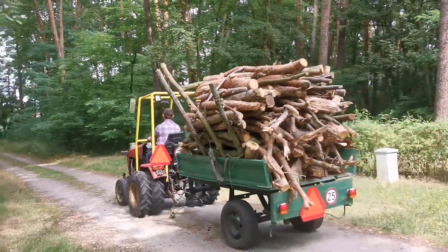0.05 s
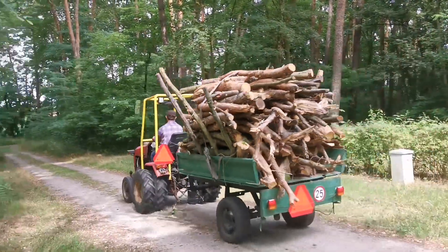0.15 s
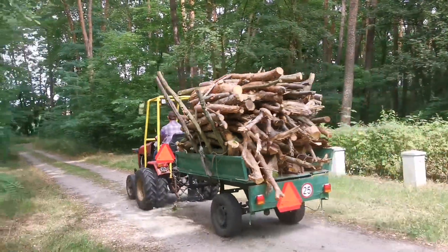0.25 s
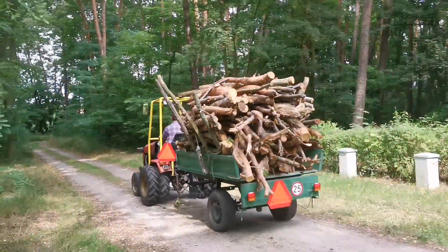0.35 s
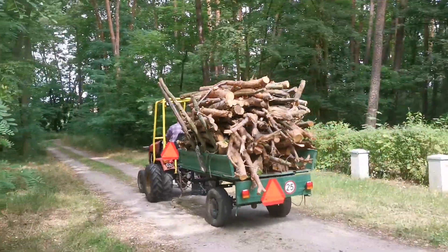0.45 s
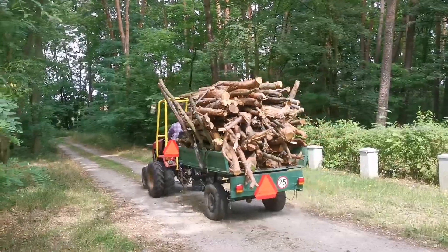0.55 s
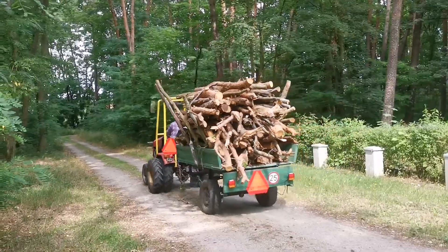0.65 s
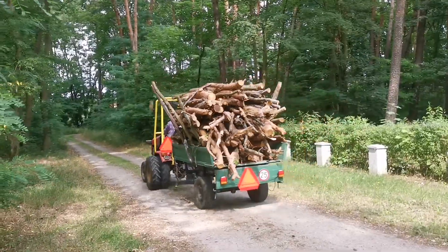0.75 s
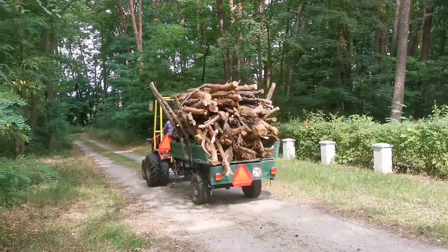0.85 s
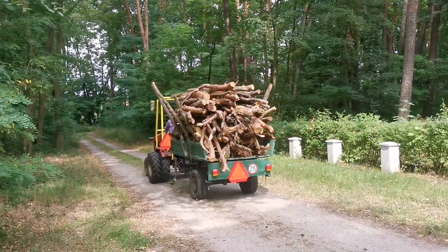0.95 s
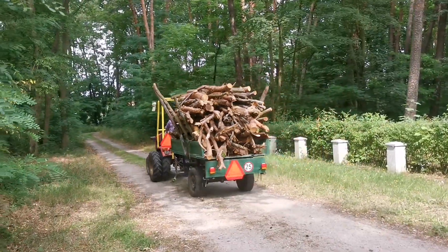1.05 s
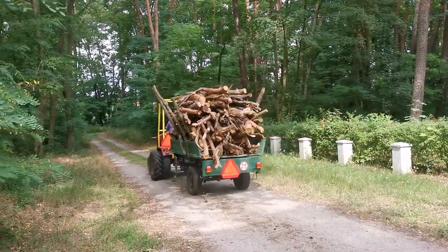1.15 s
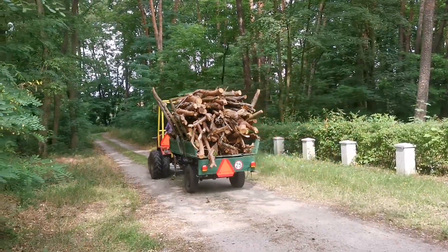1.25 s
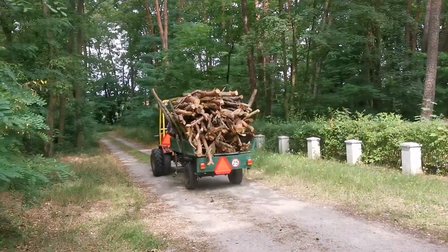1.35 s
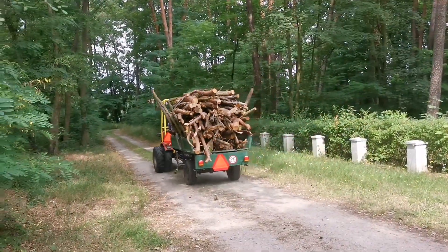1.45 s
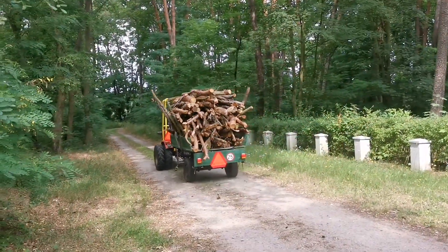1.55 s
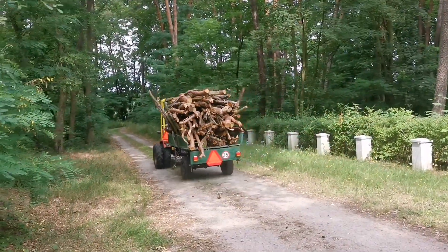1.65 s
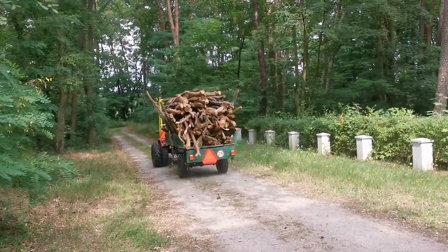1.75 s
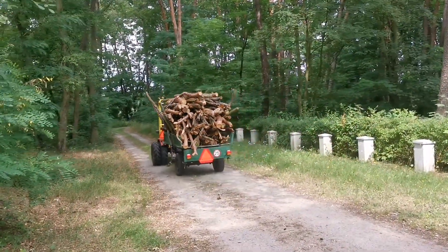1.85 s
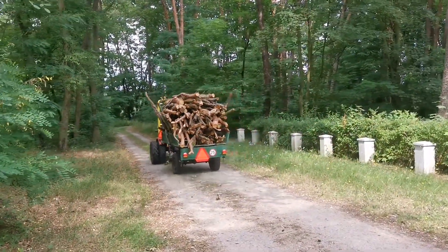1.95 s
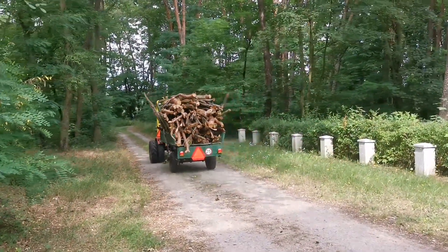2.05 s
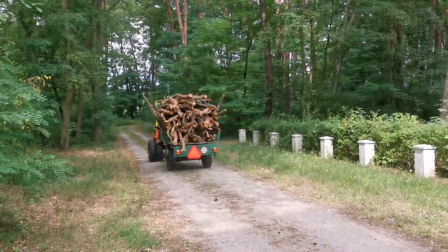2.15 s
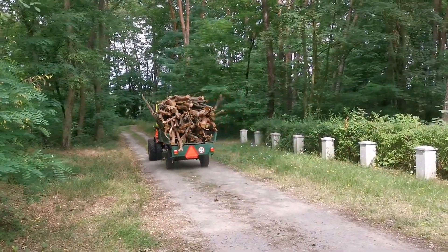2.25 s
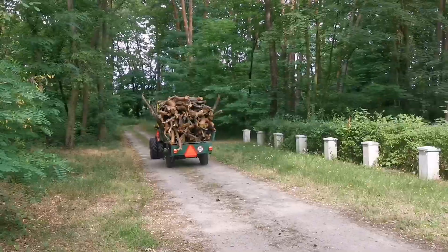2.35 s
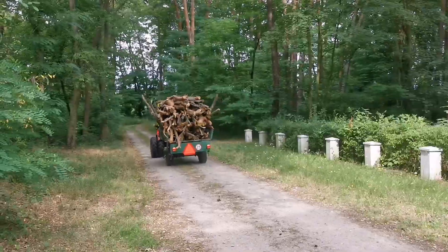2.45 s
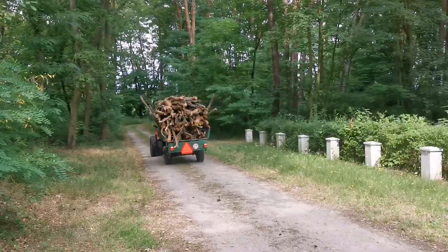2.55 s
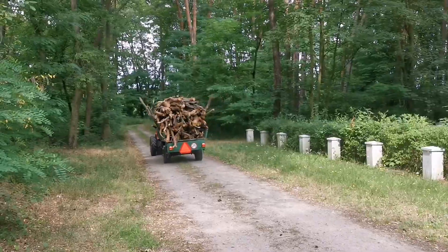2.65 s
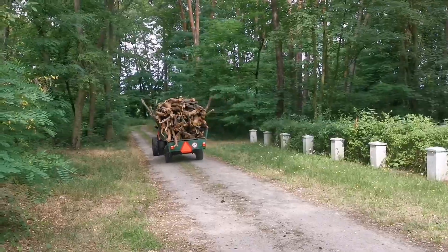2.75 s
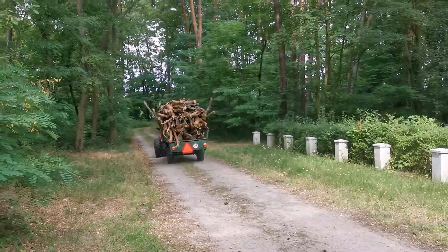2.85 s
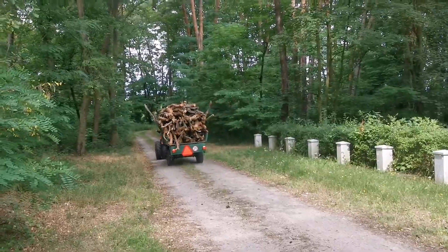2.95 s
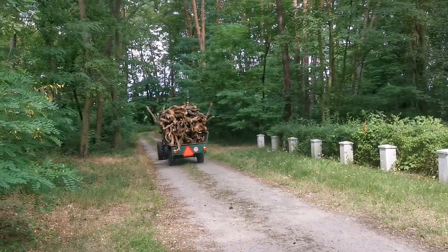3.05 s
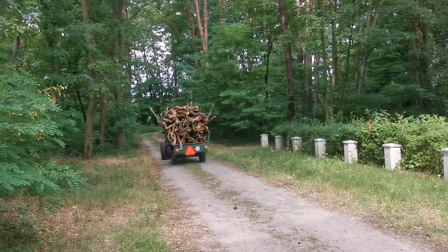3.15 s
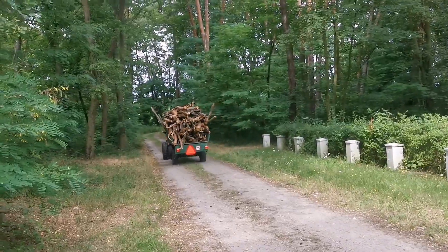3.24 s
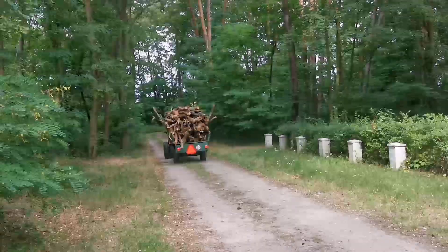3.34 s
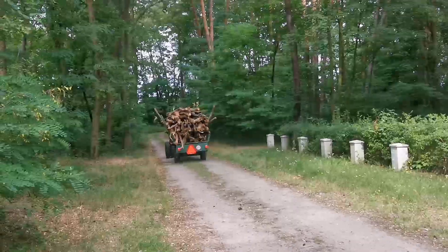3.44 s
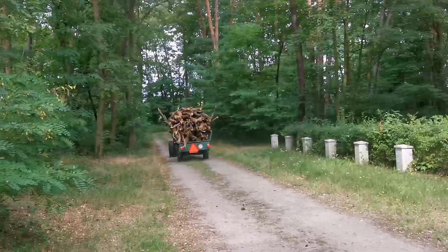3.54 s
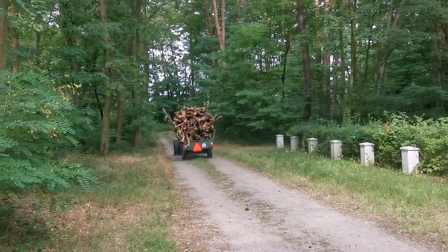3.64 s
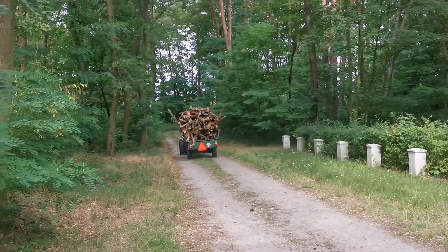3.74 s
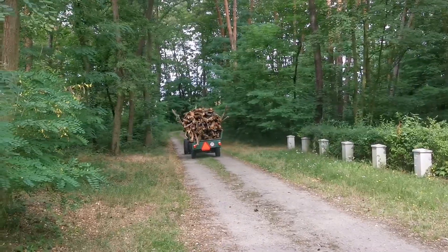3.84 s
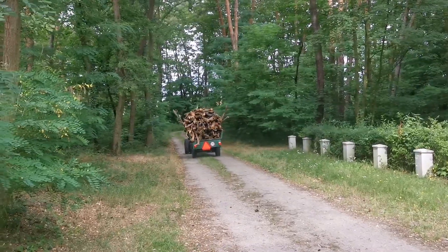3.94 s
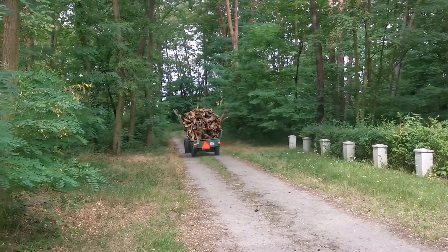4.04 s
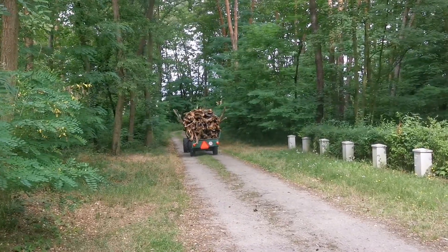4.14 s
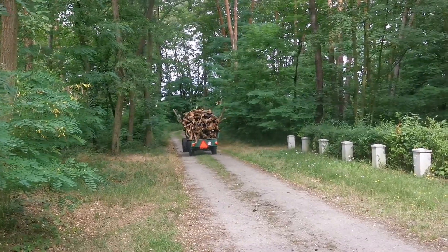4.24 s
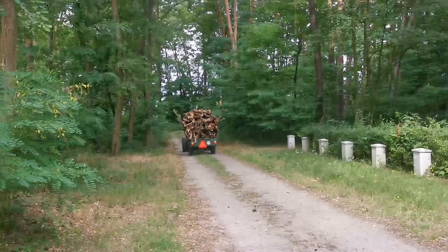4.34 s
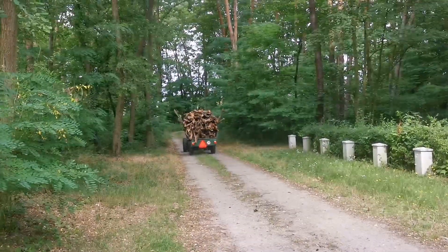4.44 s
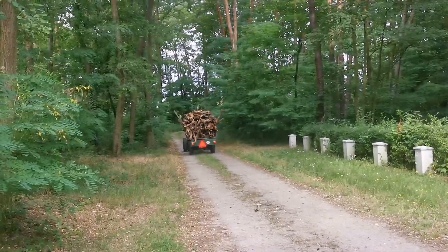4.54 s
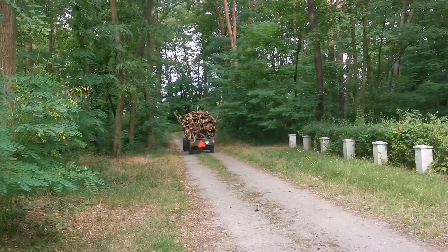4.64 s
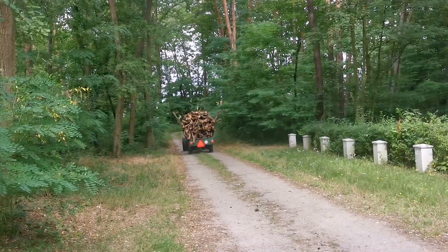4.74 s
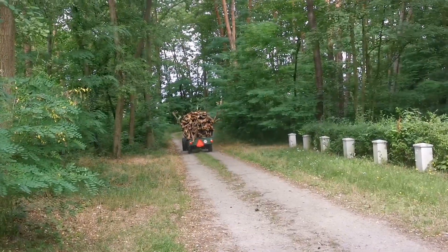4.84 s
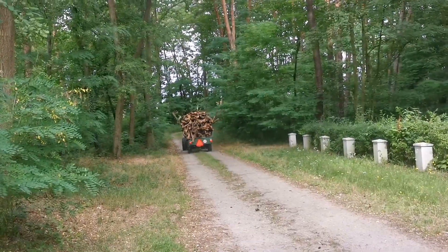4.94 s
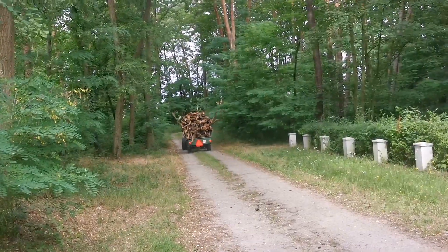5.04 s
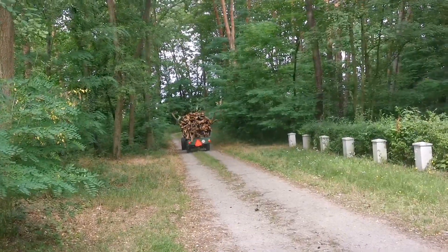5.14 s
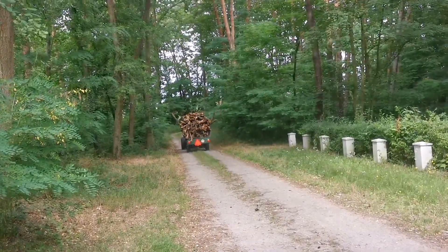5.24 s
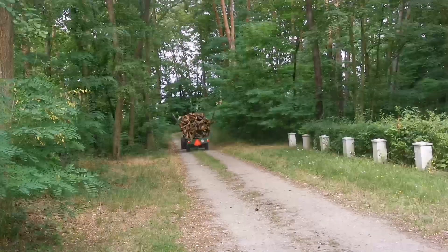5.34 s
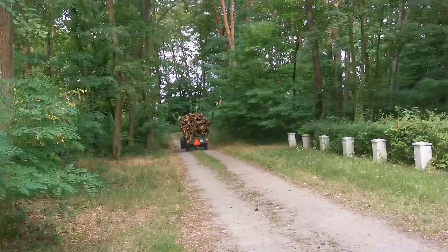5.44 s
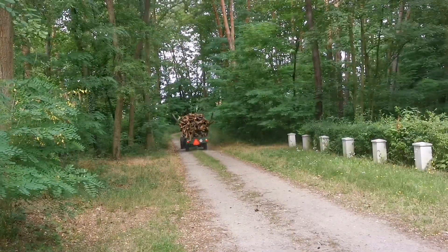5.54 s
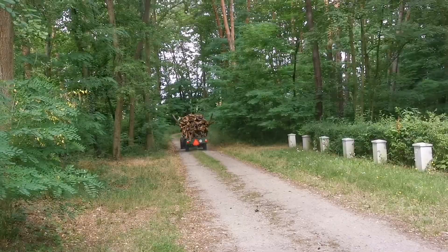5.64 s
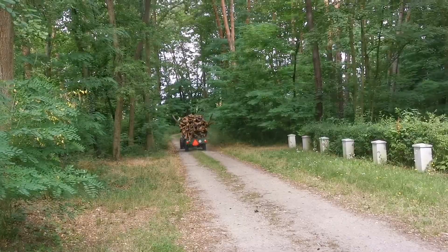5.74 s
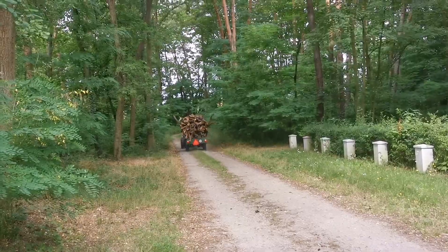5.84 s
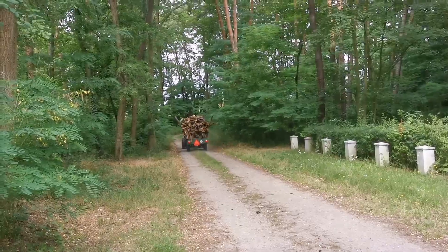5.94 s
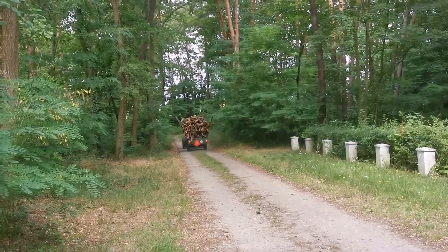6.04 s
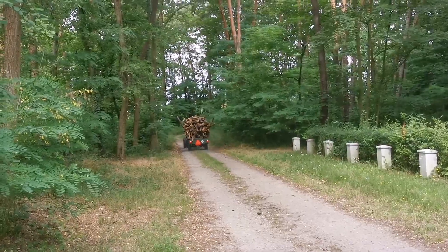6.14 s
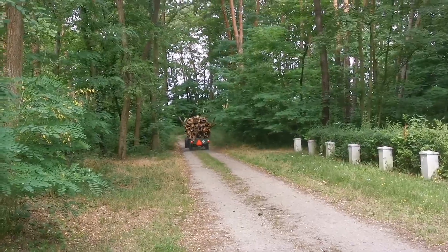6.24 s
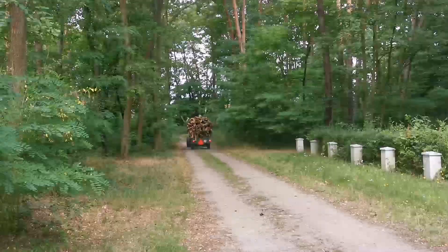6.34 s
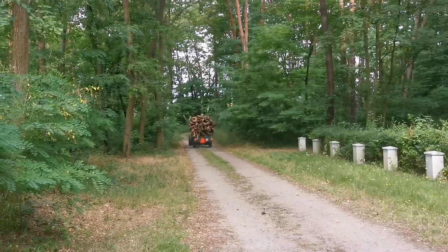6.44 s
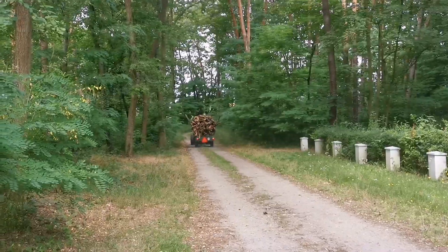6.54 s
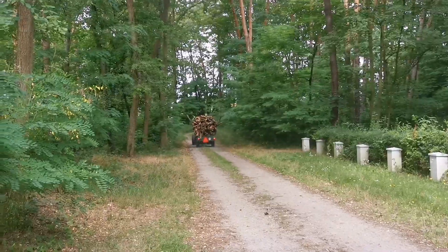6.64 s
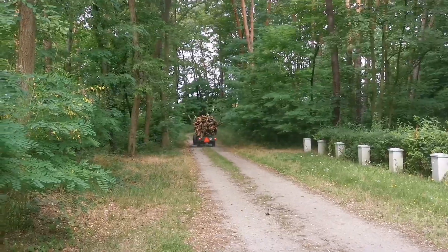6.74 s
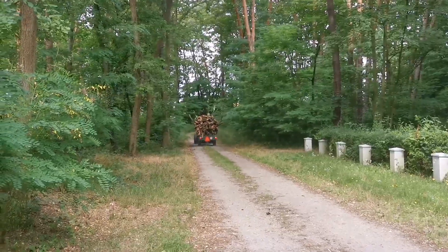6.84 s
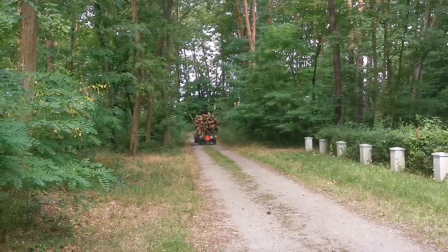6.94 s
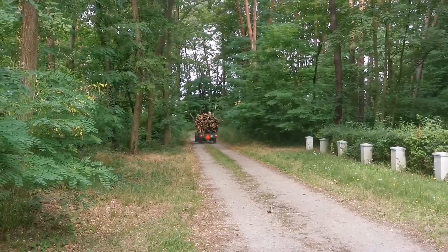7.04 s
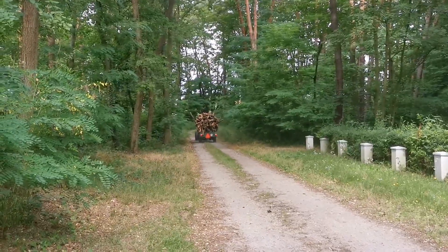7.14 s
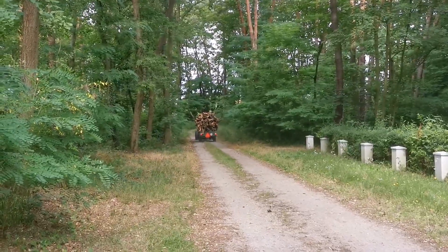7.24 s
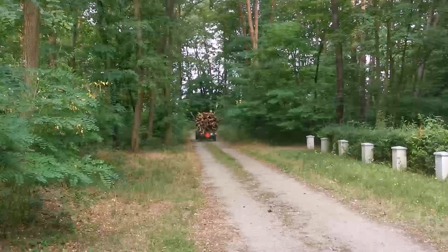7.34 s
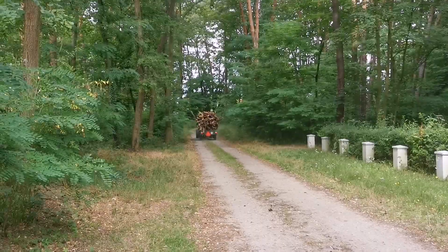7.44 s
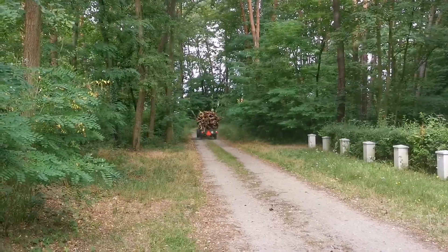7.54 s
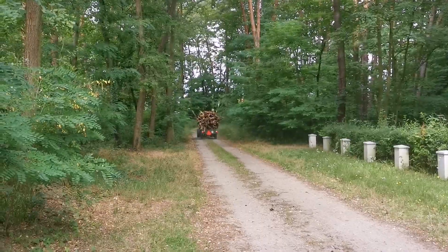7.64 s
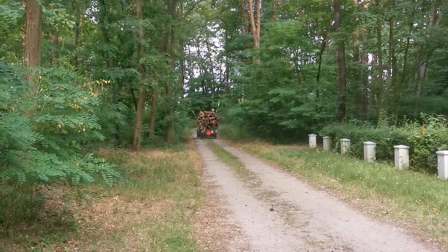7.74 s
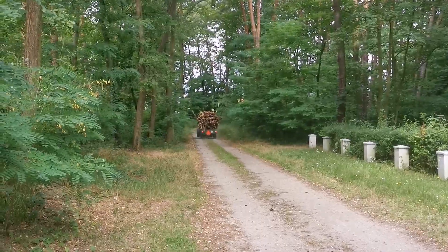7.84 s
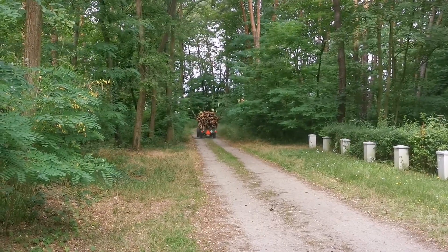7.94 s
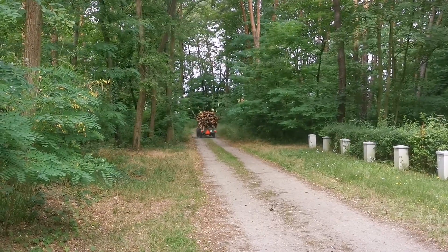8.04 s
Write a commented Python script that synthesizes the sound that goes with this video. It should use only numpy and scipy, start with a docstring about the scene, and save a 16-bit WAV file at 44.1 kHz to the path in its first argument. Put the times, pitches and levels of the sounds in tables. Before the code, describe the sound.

Close diesel chug and metallic clatter recede at an even pace, with wooden knocks and loose steel rattles, leaving a softer drone under trees.

```python
"""A diesel tractor drones and clatters away along a forest track, from about 6 to 30 m off the microphone.
One firing count times the exhaust tones and the noise of muffler, block and injectors; a delayed copy
of boom and clatter comes back off the trailer. Struck modes and noise bursts make its logs knock and its
steel clank; a scattered tail answers from the trees, where faint gliding whistles call over a steady wash.
"""
import sys
import numpy as np
from scipy import signal
from scipy.fft import rfft, irfft, next_fast_len
from scipy.io import wavfile
from scipy.ndimage import map_coordinates

SR = 44100
rng = np.random.default_rng(int(sys.argv[2]) if len(sys.argv) > 2 else 0)


def int16_out(signal):
    """Quantize to a 16-bit WAV file."""
    q = np.round(np.clip(np.atleast_2d(signal).T, -1, 1) * 32767)
    wavfile.write(sys.argv[1], SR, q.astype(np.int16))


N = 356765

# The engine's uneven pace: time_s, rate_hz (firings per second)
ENGINE_PACE = [(0.0, 80.3), (0.48, 79.3), (0.72, 80.9), (0.88, 79.6), (1.0, 81.0), (1.12, 79.9),
               (1.2, 80.9), (1.36, 79.1), (1.52, 81.4), (1.64, 79.2), (1.72, 80.5), (1.92, 79.2),
               (2.04, 81.0), (2.16, 78.9), (2.36, 79.9), (2.88, 79.0), (2.96, 77.5), (3.2, 80.1),
               (3.32, 80.2), (3.6, 77.7), (3.72, 80.4), (4.04, 80.0), (4.16, 78.7), (4.28, 81.0),
               (4.4, 79.7), (4.52, 81.2), (4.64, 79.8), (5.04, 81.6), (5.12, 79.8), (5.48, 81.7),
               (5.6, 80.2), (6.0, 80.8), (6.16, 80.0), (6.32, 80.6), (6.44, 79.2), (6.52, 80.1),
               (7.56, 79.0), (7.68, 79.5), (7.8, 78.3), (8.08, 79.7)]


def crankshaft():
    """Firings counted since the start; the rate also wanders a little at random."""
    wander_hz = 0.1013
    return np.cumsum(curves(ENGINE_PACE)[0] + wander_hz * wobble(9)) / SR


# Strong exhaust tones on the first three multiples of the firing rate:
# level_db (rms at the start, before the swell), fall_db (per tenfold distance), waver_db (random)
EXHAUST_TONES = [(-32.5, 17.5, 0.3), (-35, 17, 0.5), (-37.9, 16.5, 0.5)]
# The tones swell and fade on the way: time_s, first_db, second_db, third_db (change of each tone)
TONE_SWELL = [(0.0, 0.0, -1.0, -4.5), (0.28, 0.5, -2.5, 1.5), (0.44, -2.0, 3.0, -4.0),
              (0.76, 0.0, -0.5, -5.5), (0.88, 0.5, 1.5, -1.5), (1.0, 0.0, -1.5, -7.5),
              (1.28, 0.5, -2.0, 1.0), (1.44, 0.0, 2.0, 0.5), (1.56, 0.0, -3.0, -3.0),
              (1.64, -1.0, -2.5, 2.0), (1.96, 1.0, -0.5, 4.0), (2.28, -1.0, 2.0, 2.5),
              (2.44, 2.0, 2.0, -1.0), (2.76, -1.5, 1.5, 6.0), (2.96, 0.0, 1.5, 0.0), (3.12, 1.5, -1.0, 0.5),
              (3.36, -1.0, 1.5, -1.5), (3.84, 1.5, -0.5, 0.5), (3.92, 0.0, 0.0, -2.5),
              (4.2, 0.0, -0.5, 0.5), (4.44, 1.0, -0.5, 0.5), (4.88, -2.5, -2.0, -1.5),
              (5.2, 2.0, -2.0, 0.5), (5.52, -0.5, -4.0, -3.5), (5.68, -1.0, 0.0, -1.5),
              (5.76, 0.5, -4.0, -1.5), (5.92, 1.0, 1.5, 0.0), (6.08, 0.0, -2.5, -1.5),
              (6.44, -1.0, -0.5, -2.0), (7.52, -1.0, -2.0, -0.5), (7.72, -2.5, -1.0, -3.5),
              (8.08, 0.0, -1.0, -1.0)]
# Weak tones from unequal cylinders and the gears:
# multiple (of the firing rate), level_db (relative, before waver and mixing)
WEAK_TONES = [(1.251, -11), (1.498, -19), (2.248, -12), (2.499, -7), (3.251, -13), (3.55, -2.5),
              (3.751, -12.5), (4, -7.5), (4.5, -8), (5.75, -11), (6.002, -18.5), (6.502, -22)]
# Colour of the muffler's boom: pitch_hz, level_db (relative, per Hz)
MUFFLER_COLOUR = [(20, -25), (45, -21), (80, -10.5), (120, -11), (160, -6), (195, 2), (240, -3.5),
                  (290, -0.5), (340, -3), (410, -17.5), (600, -38), (1200, -72)]
# The boom against its even fall with distance: time_s, lift_db
BOOM_DRIFT = [(0, -1), (.6, -1), (.9, -2), (1.55, -2.5), (2.2, 0.5), (3.1, .5), (4.3, 1.5), (5.3, 1),
              (6.1, 1), (6.7, 0.5), (8.09, -0.5)]
# rms level at the start before lifts (dB), fall (dB per tenfold distance)
BOOM_DB, BOOM_FALL_DB = -41.5, 18.5
LOPE = 0.16  # unequal cylinders make the drone lope once in four firings: share of its level


def exhaust(firing):
    """Three clean, loping firing tones, weak tones between them and a puffing boom in the muffler."""
    turn = 2 * np.pi * firing
    drone = np.zeros(N)
    settings = zip(EXHAUST_TONES, curves(TONE_SWELL))
    for k, ((db, fall_db, waver_db), swell_db) in enumerate(settings, 1):
        # the muffler holds back the higher tones, which spreads each pulse
        tone = np.sin(k * turn - 1.94 * k ** 2 + 0.1 * wobble(6))
        drone -= receding(db + swell_db + waver_db * wobble(12), fall_db) * tone
    weak = np.zeros(N)
    for k, db in WEAK_TONES:
        level = amp(db + 2.8 * wobble(4.9))
        phase = 2 * np.pi * rng.random() + 0.16 * k * wobble(7)
        weak += level * np.sin(k * turn + phase)
    strokes = puffs(firing, depth_db=4, cylinder_db=-1.0, scatter_db=1.2)
    boom = coloured(strokes, MUFFLER_COLOUR)
    boom = unit(boom + amp(-6) * reflection(boom))
    boom_gain = receding(BOOM_DB + curves(BOOM_DRIFT)[0] + surges()[0], BOOM_FALL_DB)
    lope = 1 + LOPE * np.cos(turn / 4)
    # the root of two turns the tones' rms levels into sine peaks
    return np.sqrt(2) * lope * drone + boom_gain * (boom + amp(-4.0) * weak)


# Colour of the block's clatter: pitch_hz, level_db (relative, per Hz)
BLOCK_COLOUR = [(200, -40), (400, -21), (500, -7.5), (660, -1.5), (790, -7), (950, -1), (1250, -3),
                (1650, -0.5), (1900, -2.5), (2600, -7.5), (3200, -18), (4200, -25.5), (6000, -35),
                (9000, -72)]
# How strongly the covers ring: time_s, level_db (against the clatter)
COVER_STRENGTH = [(0, -21), (.5, -10), (1.0, -10), (1.15, -10.5), (1.6, -14.5), (1.85, -6.5), (2.07, -5.5),
                  (2.25, -6.5), (3.0, -14), (4.5, -15.5), (8.09, -12.5)]
# rms level at the start before lifts (dB), fall (dB per tenfold distance)
CLATTER_DB, CLATTER_FALL_DB = -37.5, 23.5


def block(firing):
    """Diesel clatter, combed by its reflection, and the covers that it shakes."""
    strokes = puffs(firing, depth_db=2.5, cylinder_db=2.0, scatter_db=0.5)
    blows = strokes + amp(-7.0) * knocking(firing, t60=0.043)
    clatter = coloured(blows, BLOCK_COLOUR)
    # the reflection returns weaker in the treble: (Hz, dB)
    echo_colour = [(300, 2.0), (900, -4.5), (1400, -12.5), (2200, -10.5), (3000, -15)]
    echo = filtered(reflection(clatter), lambda hz: amp(along(echo_colour, hz)))
    panels = amp(curves(COVER_STRENGTH)[0]) * covers(blows)
    gain = receding(CLATTER_DB + surges()[1] + 0.51 * wobble(12), CLATTER_FALL_DB)
    return gain * unit(unit(clatter + echo) + panels)


def knocking(firing, t60):
    """Each cylinder rings the block in its own way, alike from cycle to cycle."""
    starts = np.flatnonzero(np.diff(firing.astype(int)))
    t = np.arange(SR // 16) / SR
    out = np.zeros(N)
    for cylinder in range(4):
        blows = np.zeros(N)
        blows[starts[cylinder::4]] = 1
        answer = rng.standard_normal(len(t)) * amp(-60 * t / t60)
        out += signal.fftconvolve(blows, answer)[:N]
    return unit(out * amp(1.1 * wobble(60)))


# Resonances of the engine covers: centre_hz, width_hz, level_db (relative, before its random swell)
COVER_MODES = [(642, 46, -8), (756, 27, -13), (1229, 38, 6), (1315, 36, 1.5), (1685, 67, 0.5),
               (2205, 57, -3), (2740, 150, -9.5)]


def covers(blows):
    """Thin panels ring in narrow bands, each swelling and fading on its own."""
    panels = np.zeros(N)
    for centre_hz, width_hz, db in COVER_MODES:
        panels += amp(db + 3 * wobble(9)) * resonance(blows, centre_hz, width_hz)
    return unit(panels)


# The reflection off the trailer: time_s, delay_ms, level_db (before each source's own echo setting)
TRAILER_ECHO = [(0, 1.17, 3), (.2, 1.3, -1.5), (.45, 1.4, 1), (1, 1.54, 0), (2, 1.576, 3.5), (4, 1.61, -1),
                (8.09, 1.74, -2.5)]


def reflection(x):
    """The trailer's front wall returns a copy whose delay grows as it lines up behind the engine."""
    delay_ms, echo_db = curves(TRAILER_ECHO)
    n = np.arange(N)
    return amp(echo_db) * np.interp(n - delay_ms * SR / 1000, n, x)


# The rasp from the open flank: time_s, level_db (rms), pitch_hz (centre)
FLANK_RASP = [(0, -41.5, 1615), (.2, -42.5, 1606), (.45, -42.5, 1480), (.7, -47.5, 1344), (1.0, -44, 1251),
              (1.3, -75, 1253), (2, -100, 1240)]
FLANK_HZ, FLANK_WIDTH_HZ = 1510, 130  # its band before it is shifted to that pitch
# the hollow ring of the engine bay: (centre Hz, width Hz, dB at the start, fall dB per tenfold distance)
HOLLOW_HZ, HOLLOW_WIDTH_HZ, HOLLOW_DB, HOLLOW_FALL_DB = 771, 67, -44, 40.5


def engine_bay(firing):
    """A bright, sinking rasp escapes while the flank faces the microphone; a hollow ring fades with distance."""
    level_db, pitch_hz = curves(FLANK_RASP)
    blows = puffs(firing, depth_db=4.0, cylinder_db=3.0, scatter_db=1.5)
    band = resonance(blows, FLANK_HZ, FLANK_WIDTH_HZ)
    shift = np.exp(2j * np.pi * np.cumsum(pitch_hz - FLANK_HZ) / SR)
    rasp = amp(level_db) * np.real(signal.hilbert(band) * shift)
    hollow = resonance(blows, HOLLOW_HZ, HOLLOW_WIDTH_HZ)
    return rasp + receding(HOLLOW_DB, HOLLOW_FALL_DB) * hollow


# Colour of the injector and valve hiss: pitch_hz, level_db (relative, per Hz)
HISS_COLOUR = [(1500, 1), (3000, -2.5), (4400, -4), (5200, 0.5), (5800, 2.5), (6500, -0.5), (7600, 1),
               (8100, -4.5), (8400, -13.5), (8800, -9.5), (9300, -25), (10000, -28.5), (15000, -34.5)]
# level at the start before lifts (dB), fall (dB per tenfold distance)
HISS_DB, HISS_FALL_DB = -45.5, 21.5
# one injector ticks once in each four firings:
# (dB against the spray at the start, extra fall dB per tenfold distance, decay dB per firing)
TICK_DB, TICK_FALL_DB, TICK_DECAY_DB = -7, 12, 16


def hiss(firing):
    """Injectors and valve gear hiss high above the clatter; one injector's tick is clearest close by."""
    spray = puffs(firing, depth_db=-1.0, cylinder_db=0.0, scatter_db=0.62)
    tick = unit(amp(-TICK_DECAY_DB * (firing % 4)) * rng.standard_normal(N))
    source = spray + receding(TICK_DB, TICK_FALL_DB) * tick
    gain = receding(HISS_DB + surges()[2] + 1.37 * wobble(11), HISS_FALL_DB)
    return gain * coloured(source, HISS_COLOUR)


def puffs(firing, depth_db, cylinder_db, scatter_db):
    """Noise that restarts at each firing and sinks by depth_db until the next; each cylinder has its strength."""
    count = firing.astype(int)
    cylinder = np.array([-0.031, -0.12, 0.17, 0.23])[count % 4]
    size_db = cylinder_db * cylinder + scatter_db * rng.standard_normal(1024)[count]
    return unit(amp(size_db - depth_db * (firing % 1)) * rng.standard_normal(N))


# The running noise swells or dips: time_s, width_s, boom_db, clatter_db, hiss_db (change of each)
NOISE_SURGES = [(.12, 0.026, 2, 3.5, 0), (.43, 0.068, 4, 0, 3.5), (0.719, 0.078, 0.5, 2, 0.5),
                (1.3, 0.043, 1, 1, 4), (2.85, 0.41, 2, .5, 1), (1.54, 0.029, 3, -1.5, 2),
                (2.2, .04, -3, -1.5, 2), (2.45, .06, 1.5, -1.5, 1.5), (3.28, 0.14, 1.5, 0, 3),
                (3.84, 0.02, 5, 2.5, 0), (4.5, 1, 0.5, 0.6, 2)]


def surges():
    """Lift in dB over time of the boom, the clatter and the hiss."""
    t = np.arange(N) / SR
    lift_db = 0
    for s, width, *peaks_db in NOISE_SURGES:
        lift_db = lift_db + np.outer(peaks_db, np.exp(-((t - s) / width) ** 2))
    return lift_db


# the drive: metres along the track at the start, metres to its side, speed (m/s)
START_M, ASIDE_M, DRIVE_M_PER_S = 5.27, 3.22, 3.086


def receding(db, fall_db):
    """Gain over time of a source that drives away from the microphone at an even speed."""
    distance_m = np.hypot(ASIDE_M, START_M + DRIVE_M_PER_S * np.arange(N) / SR)
    return amp(db - fall_db * np.log10(distance_m / distance_m[0]))


# Bumps shake the trailer's steel fittings: start_s, level_db (before a 6.5 dB cut),
# focus_hz (strongest), ring_db (relative), ring_t60_s, thud_db (boards, relative)
FITTING_CLANKS = [(0.107, -44, 2790, -9, .3, 16), (0.131, -43, 6950, -14, .3, -3),
                  (0.484, -34, 5470, -10, 0.18, 12), (.496, -44, 2420, 10, 0.1, 8),
                  (0.507, -47, 2950, 17, .1, 5), (0.683, -51, 2700, 5, .1, 9),
                  (.728, -43, 2450, 2, 0.11, 13), (2.022, -50, 2700, -7, .3, 10),
                  (2.06, -60, 5600, -1, 0.27, 10), (3.272, -43.5, 5400, 5, 0.12, 2),
                  (3.587, -37, 5300, 6, 0.14, 3), (3.597, -46.5, 5620, 6.5, 0.69, 8),
                  (5.158, -50, 4290, 7, 0.32, 10), (5.165, -49, 7400, 3.5, 0.29, 9),
                  (5.175, -58, 3400, 8, .42, 13)]
# Colour of steel sliding on steel: pitch_hz, level_db (relative, per Hz)
SCRAPE_COLOUR = [(1000, -14), (2600, -5), (3500, -4), (4300, 1.5), (5800, 13.5), (7600, 7), (8800, -8),
                 (10000, -15), (12000, -32), (15000, -49)]
# Colour of the trailer's boards: pitch_hz, level_db (relative, per Hz)
BOARD_COLOUR = [(150, -24), (400, -13), (650, -7), (1000, -13), (1500, 3.5), (2500, 5), (3400, -1),
                (6000, -49)]
# Logs knock together: start_s, level_db (before a 3 dB cut), pitch_hz, t60_s
LOG_KNOCKS = [(.408, -41, 780, 0.044), (.640, -26.5, 1200, 0.032), (.685, -27, 1340, 0.053),
              (.724, -31, 1310, 0.032), (1.306, -28.5, 693, 0.037), (1.444, -32, 1710, 0.06),
              (1.755, -27, 1125, 0.021), (3.275, -28, 766, 0.016), (3.592, -39.5, 593, 0.19),
              (3.841, -33.5, 600, 0.053), (4.514, -47, 710, 0.032), (6.829, -38, 1150, .02)]


def trailer():
    """Bumps make the fittings scrape and ring, shake the boards and knock the logs together."""
    out, t = np.zeros(N), np.arange(SR // 2) / SR
    rise = 1 - np.exp(-t / 0.003)
    for s, db, focus_hz, ring_db, ring_t60, thud_db in FITTING_CLANKS:
        scrape_decay = amp(-60 * t / 0.051) + amp(10.5 - 60 * t / 0.036)
        scrape = coloured(rng.standard_normal(len(t)), SCRAPE_COLOUR) * scrape_decay
        thud = coloured(rng.standard_normal(len(t)), BOARD_COLOUR) * amp(thud_db - 60 * t / 0.14)
        steel = amp(ring_db) * rattle(t, focus_hz, ring_t60)
        add(out, s, amp(db - 6.5) * rise * (scrape + thud + steel))
    knock_rise = 1 - np.exp(-t / 0.0005)
    for s, db, hz, t60 in LOG_KNOCKS:
        add(out, s, amp(db - 3) * knock_rise * log_ring(t, hz, t60, scatter_db=1.5))
    return out


# Resonances of the steel fittings: centre_hz, width_hz, level_db (relative, before the focus)
STEEL_MODES = [(2260, 200, -7), (2490, 99, 0), (2670, 90, 1), (2930, 130, 1), (3246, 90, 2), (4140, 280, 2),
               (4450, 360, -3), (5080, 140, 2), (5470, 130, -2), (5700, 130, 4), (6780, 110, -13),
               (7310, 170, 0), (8800, 200, 0)]
FOCUS_DB_PER_OCTAVE = 37  # how fast resonances far from the strongest one fall away


def rattle(t, focus_hz, t60):
    """Loose steel chatters in its resonances; where it is struck decides which ones speak."""
    def response(f):
        total = 0
        for k, (hz, width, db) in enumerate(STEEL_MODES):
            focused_db = db - FOCUS_DB_PER_OCTAVE * abs(np.log2(hz / focus_hz))
            mode = 1j * f * width / (hz * hz - f * f + 1j * f * width)
            total = total + (-1) ** k * amp(focused_db) * mode
        dull = 1 / np.sqrt(1 + (f / 9200) ** 12)
        return total * dull
    return unit(filtered(rng.standard_normal(len(t)), response)) * amp(-60 * t / t60)


# Modes of a struck log: multiple (of its pitch), level_db (relative, before scatter), life (multiple of its t60)
WOOD_MODES = [(.66, -15, 1.5), (0.831, -6.5, 1.2), (0.999, -0.5, 1), (1.22, -1, .8), (1.62, -12.5, .6),
              (2.55, -17, .5)]


def log_ring(t, hz, t60, scatter_db):
    """A struck log: thick ones ring low, tightly wedged ones die fast."""
    modes = [(hz * ratio, db, t60 * life) for ratio, db, life in WOOD_MODES]
    return ring(modes, t, scatter_db)


def jostle(count):
    """Small random taps in the shaking load, fading with distance faster than the clatter."""
    out, t = np.zeros(N), np.arange(SR // 14) / SR
    touch = 1 - np.exp(-(t / 0.00076) ** 2)  # bark softens each contact
    for when, softness, pitch in rng.random((count, 3)):
        tap = log_ring(t, hz=720 * (1 + 0.8 * pitch), t60=0.06, scatter_db=3.0)
        add(out, when * N / SR, amp(-10 * softness) * touch * tap)
    return receding(db=-53.5, fall_db=35.0) * unit(out)


# How long the trees answer: pitch_hz, t60_s
FOREST_DECAY = [(100, 0.25), (1000, 0.43), (5000, 0.79), (12000, 0.3)]


def forest(x):
    """Trunks scatter a soft tail of noise that dies at its own pace at each frequency."""
    hz, t, z = signal.stft(rng.standard_normal(SR // 2), SR, nperseg=256)
    decay = amp(-60 * t / along(FOREST_DECAY, hz)[:, None])
    tail = signal.istft(z * decay, SR, nperseg=256)[1]
    return signal.fftconvolve(x, tail / np.linalg.norm(tail))[:N]


# Faint birds in the trees: start_s, length_s, pitch_hz, glide_hz_per_s, level_db (peak)
BIRD_CALLS = [(7.285, .06, 4330, -500, -67), (7.645, .06, 4000, -600, -63), (7.673, 0.079, 5130, -500, -62),
              (7.758, .08, 4510, -1200, -64), (7.99, 0.12, 2400, 7500, -58.5)]


def bird():
    """Short, soft whistles that glide in pitch and quiver."""
    out = np.zeros(N)
    for s, length, hz, glide, db in BIRD_CALLS:
        t = np.arange(round(length * SR)) / SR
        pitch_hz = hz + glide * t + 45 * wobble(200)[:len(t)]
        whistle = np.sin(2 * np.pi * np.cumsum(pitch_hz) / SR)
        add(out, s, amp(db) * np.hanning(len(t)) * whistle)
    return out


# Colour of the even wash under the trees: pitch_hz, level_db (relative, per Hz)
AIR_COLOUR = [(20, 2), (60, -9), (200, -3), (400, 7.5), (560, 13.5), (850, -6.5), (2500, -1.5), (4200, -19),
              (6000, -13), (8000, -38), (9500, -37), (15000, -57)]
# Colour of a light breeze on the microphone ports: pitch_hz, level_db (relative, per Hz)
BREEZE_COLOUR = [(20, 4), (40, 1), (70, -11), (150, -14), (600, -22), (1500, -59)]


def air():
    """A steady wash shared by both microphone ports, and a faint rumble of their own."""
    wash = coloured(rng.standard_normal(N), AIR_COLOUR)
    breeze = coloured(rng.standard_normal((2, N)), BREEZE_COLOUR)
    return amp(-55.5) * wash + amp(-81) * breeze


def amp(db):
    """Decibels to gain."""
    return 10 ** (np.asarray(db) / 20)


def unit(x):
    """Scale to rms 1."""
    return x / np.sqrt(np.mean(x ** 2) + 1e-20)


def along(points, hz):
    """(Hz, value) points on a log axis."""
    f, v = np.transpose(points)
    return np.interp(np.log(hz + 1), np.log(f + 1), v)


def curves(rows):
    """One value per sample for each column after the time."""
    s, *cols = np.transpose(rows)
    return [np.interp(np.arange(N) / SR, s, c) for c in cols]


def wobble(rate):
    """A smooth random curve, rate knots a second."""
    return map_coordinates(rng.standard_normal(2048), [np.arange(N) * rate / SR], mode="wrap")


def filtered(x, response):
    """x times a response of frequency."""
    n = x.shape[-1]
    m = next_fast_len(n + 8192)
    return irfft(rfft(x, m) * response(np.fft.rfftfreq(m, 1 / SR)), m)[..., :n]


def coloured(x, spectrum):
    """x through a (Hz, dB) spectrum, at rms 1."""
    return unit(filtered(x, lambda hz: amp(along(spectrum, hz))))


def resonance(x, centre_hz, width_hz):
    """x through one steep resonance, at rms 1."""
    return unit(filtered(x, lambda hz: 1 / (1 + 1j * (hz - centre_hz) / width_hz) ** 2))


def ring(modes, t, scatter_db):
    """Damped modes, struck at new strengths each time."""
    out = np.zeros(len(t))
    for hz, db, t60 in modes:
        level = amp(db + scatter_db * rng.normal() - 60 * t / t60)
        out += level * np.sin(2 * np.pi * (hz * t + rng.random()))
    return out


def add(track, s, sound):
    """Mix a sound into a track at time s."""
    part = track[round(s * SR):][:len(sound)]
    part += sound[:len(part)]


def scattered(x):
    """The same sound with its phase scrambled by many short paths."""
    turns = np.cumsum(rng.random(400))
    knots_hz = np.linspace(0, SR / 2, len(turns))
    return filtered(x, lambda hz: np.exp(-2j * np.pi * np.interp(hz, knots_hz, turns)))


# Stereo width: pitch_hz, level_db (side against mid)
STEREO_WIDTH = [(60, -35), (250, -30.5), (600, -24), (1300, -27), (2400, -18.5), (3200, -4), (4200, 1.5),
                (5700, -3), (7000, -0.5), (8400, 3), (12000, 0.5)]


def scene():
    """One crankshaft drives every engine sound; bass reaches both ports alike, treble differs between them."""
    firing = crankshaft()
    machine = block(firing) + engine_bay(firing) + trailer() + jostle(count=220) + bird()
    # the exhaust's bass slips past the trees
    body = exhaust(firing) + machine + amp(-12.0) * forest(machine)
    mid = body + hiss(firing)
    # the side's hiss is drawn afresh
    side = filtered(scattered(body) + hiss(firing), lambda hz: amp(along(STEREO_WIDTH, hz)))
    return np.array([mid + side, mid - side]) + air()


# Colour difference of the two ports: pitch_hz, level_db (left minus right)
PORT_TILT = [(100, -0.1), (1000, -0.2), (1900, 0.5), (2800, 1), (4000, 3), (5200, -2.5), (6200, -3.5),
             (7500, 3.5), (12000, 0.5)]
TOP_HZ = 15150  # the microphone's band limit


def record(dry):
    """The ports differ a little in colour and timing; the microphone keeps nothing above its band limit."""
    lag_ms = 0.01  # left behind right

    def ports(hz):
        colour = amp(np.outer([1, -1], along(PORT_TILT, hz)) / 2)
        timing = np.exp(np.outer([-1j, 1j], np.pi * hz * lag_ms / 1000))
        return colour * timing
    return filtered(dry, lambda hz: ports(hz) * (hz < TOP_HZ))


dry = scene()
out = record(dry)
int16_out(out)
```